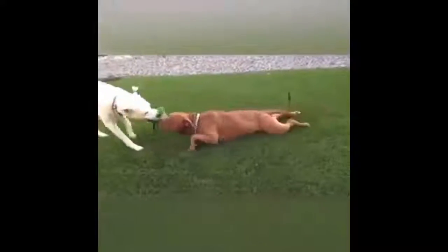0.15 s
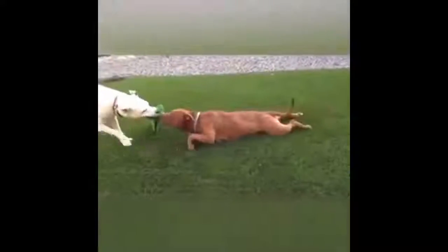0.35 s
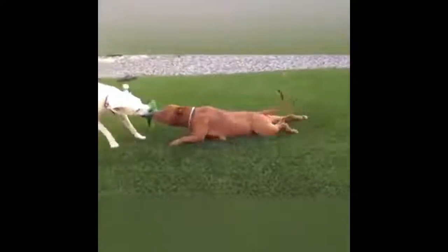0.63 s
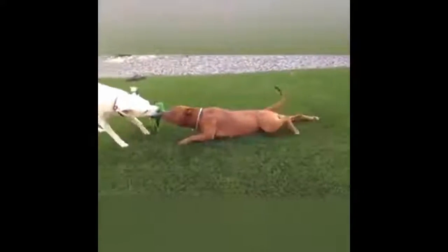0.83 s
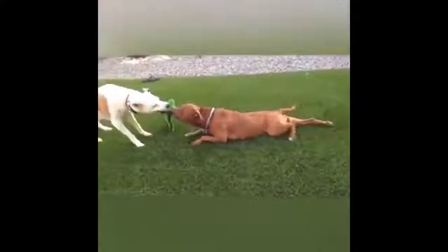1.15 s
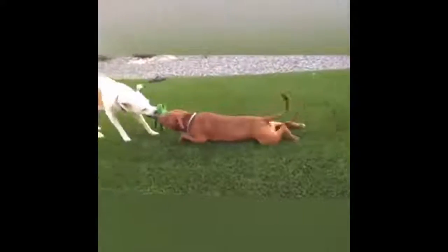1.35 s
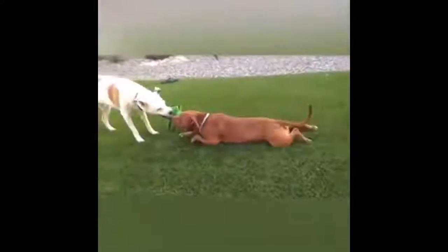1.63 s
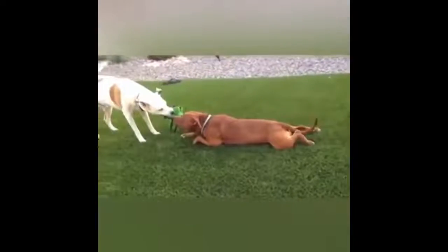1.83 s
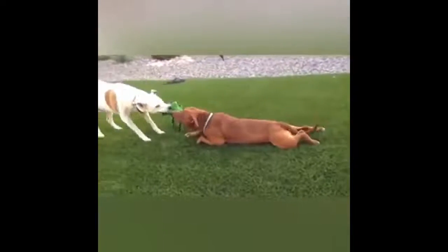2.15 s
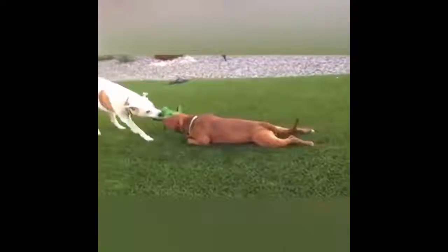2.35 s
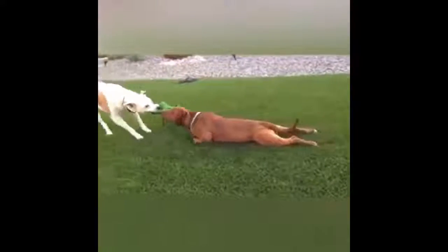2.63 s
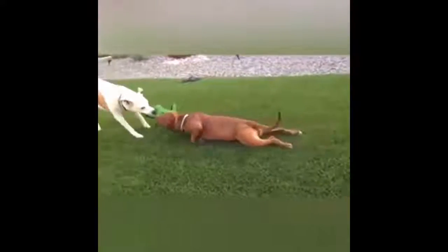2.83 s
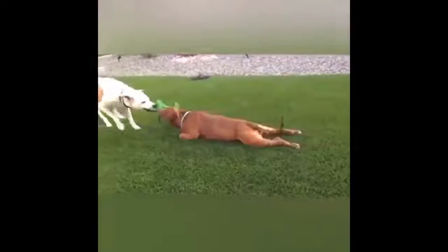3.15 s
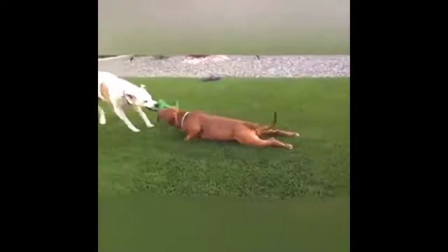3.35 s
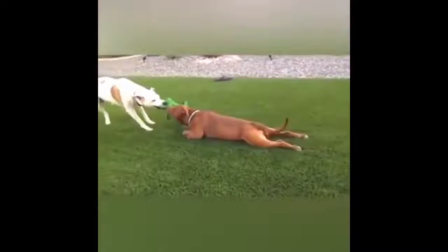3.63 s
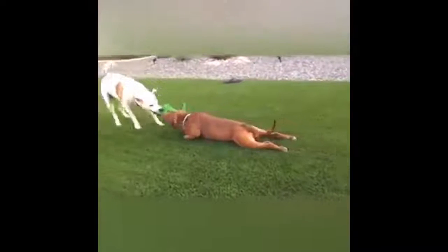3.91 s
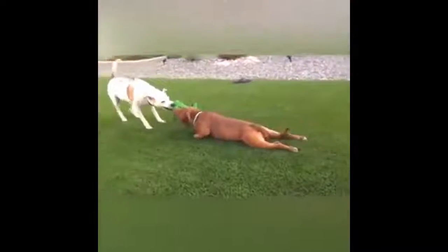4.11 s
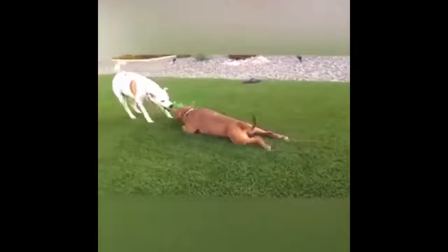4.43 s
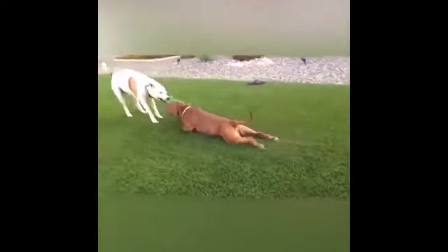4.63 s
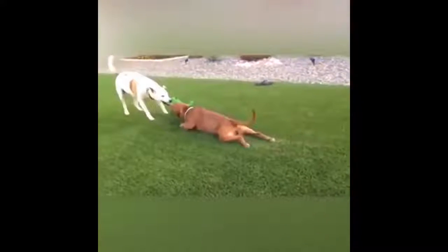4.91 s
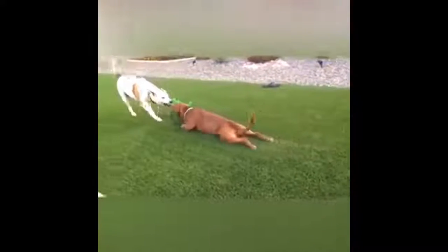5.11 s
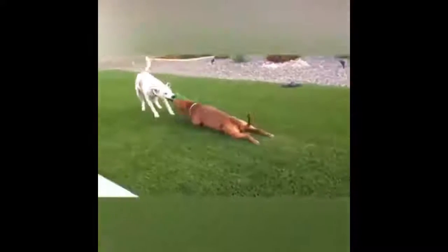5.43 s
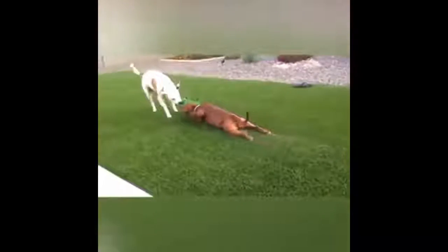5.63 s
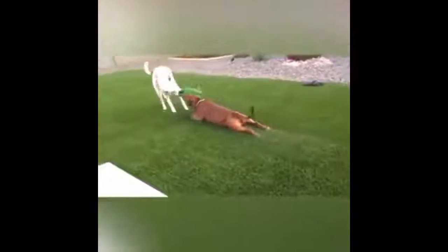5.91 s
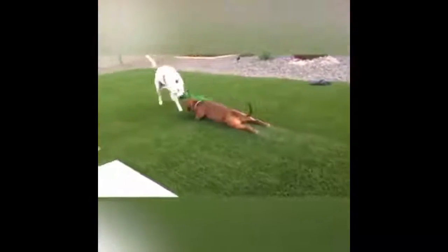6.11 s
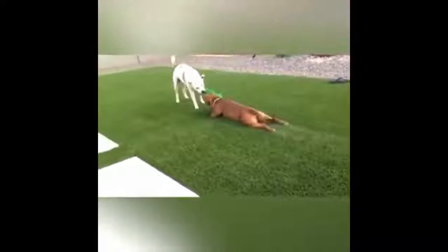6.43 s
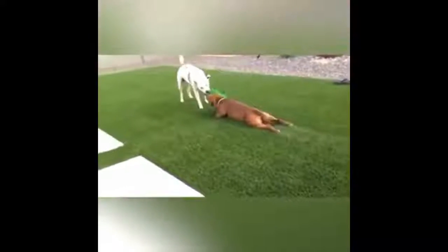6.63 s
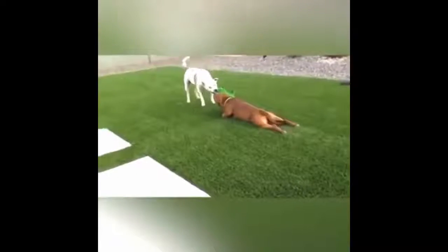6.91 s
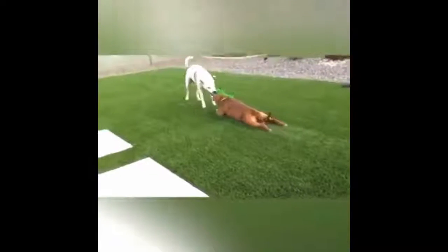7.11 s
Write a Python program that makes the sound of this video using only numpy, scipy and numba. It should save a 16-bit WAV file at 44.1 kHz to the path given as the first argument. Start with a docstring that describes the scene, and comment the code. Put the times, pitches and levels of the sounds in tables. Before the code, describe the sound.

Low playful growls come one after another from the start, a closed-mouth hum breaking into wet rasp, with single heavy flaps thudding in the throat. Small wet smacks, scratchy falling chirps and quick cracks come from a gripped rubber toy. Two faint nasal whines surface midway. Steady airy grass rustle continues underneath, dips near the end and returns. Open yard, little echo, modest handheld microphone without top treble, one tiny dropout early.

```python
"""Two dogs tug at a rubber toy on a lawn: short, low growls run over a hush of air and rustling grass.
From the start each growl opens as a muffled flutter and turns raspy; deep throbs break in, made of single flaps.
The toy soon snaps (cracks with a falling ring) and squelches (scratchy falling chirps) between their teeth.
The sound cuts out briefly after a second; a thin whine, a wavering sine, comes at 2.5 s and again at 4.3 s.
The rustle, made of crackling noise, sinks near the end and comes back."""
import sys
import numpy as np
from scipy import signal
from scipy.fft import rfft, irfft, next_fast_len
from scipy.io import wavfile
from scipy.ndimage import uniform_filter1d, map_coordinates
from numba import njit

SR = 44100
rng = np.random.default_rng(int(sys.argv[2]) if len(sys.argv) > 2 else 0)


def digitize_waveform(pressure):
    """Quantize a signal to 16-bit integers and store it at the path in sys.argv[1].

    Rows of a 2-D input are taken as channels; values are limited to [-1, 1].
    """
    field = np.atleast_2d(pressure).T
    bounded = np.clip(field, -1, 1)
    quanta = np.round(bounded * 32767).astype(np.int16)
    wavfile.write(sys.argv[1], SR, quanta)


N = 320166

# One push of air each: start_s, length_s, start_pitch_hz, widest_pitch_hz (lips widest apart),
# hum_db (through closed jaws), rasp_db (through the lips, before a small trim),
# widest (share of the length, 0-1), mouth_hz (resonance halfway through), rough (0-1)
GROWLS = [(0.06, 0.047, 170.2, 220.8, -31, -41, 0.8, 1670, 0.69),
          (0.196, 0.028, 184.4, 235, -27, -41.5, 0.71, 1210, 0.34),
          (0.213, 0.028, 233.6, 261.5, -23.5, -28.5, 0.36, 1920, 0.25),
          (0.394, 0.15, 185.1, 204.7, -31, -51, 0.78, 1520, 0.45),
          (0.675, 0.1, 195.2, 228.3, -26.5, -34, 0.62, 1290, 0.34),
          (0.967, 0.24, 181, 203, -29.5, -36.5, 0.3, 1217, 0.19),
          (1.307, 0.074, 180.1, 161.8, -39, -47.5, 0.65, 998, 0.83),
          (1.402, 0.057, 226.4, 215.9, -24.5, -32.5, 0.35, 1790, 0.19),
          (1.635, 0.26, 205.3, 171, -32.5, -45, 0.39, 1860, 0.67),
          (2.133, 0.068, 221, 204.7, -28.5, -48.5, 0.46, 881.5, 0.48),
          (2.21, 0.17, 180, 189.5, -30.5, -40, 0.51, 1700, 0.31),
          (2.548, 0.023, 184.6, 195, -29.5, -42.5, 0.97, 1500, 0.58),
          (2.699, 0.049, 170.6, 191.3, -31, -44, 0.36, 715, 0.47),
          (2.848, 0.034, 188.5, 199, -29, -42, 0.7, 894, 0.49),
          (3.038, 0.1, 170.2, 205.9, -31, -40.5, 0.51, 1394, 0.66),
          (3.282, 0.17, 170.4, 204.5, -31, -37.5, 0.69, 1623, 0.42),
          (3.624, 0.2, 154.4, 214.7, -33.5, -36.5, 0.64, 1864, 0.66),
          (3.924, 0.031, 170, 190.4, -29, -46.5, 0.65, 1228, 0.44),
          (4.154, 0.18, 189.9, 228.8, -33, -37, 0.3, 1890, 0.7),
          (4.417, 0.039, 190.3, 193.3, -36, -56, 0.4, 1423, 0.71),
          (4.665, 0.17, 180, 239.9, -30.5, -32.5, 0.62, 1820, .6),
          (5.075, 0.2, 168, 232.2, -32, -36.5, 0.72, 1770, .65),
          (5.487, 0.1, 180, 195, -37.5, -43.5, 0.22, 1256, 0.44),
          (5.697, 0.027, 170, 190, -33.5, -54, 0.64, 720, 0.58),
          (5.89, 0.2, 175, 249.9, -33, -33.5, 0.48, 877.7, .55),
          (6.278, 0.16, 150.5, 165.5, -38, -47.5, 0.22, 1903, 0.88),
          (6.939, 0.05, 160.7, 215, -34, -41, 0.83, 1898, 0.62),
          (7.121, 0.047, 175, 230, -34, -44.5, 0.7, 1950, 0.55)]
# Heavy single flaps of the throat: time_s, peak_db
THROBS = [(0.078, -16), (0.4314, -16.5), (0.6646, -26.5), (0.8982, -24), (0.9188, -22.5), (0.9583, -22),
          (1.304, -28), (1.3992, -23), (1.6337, -22), (1.7232, -21.5), (1.8565, -25.5), (2.0255, -22),
          (2.6937, -22), (2.8797, -28.5), (3.0363, -24.5), (3.1129, -19.5), (3.1369, -21), (3.315, -16.5),
          (3.655, -16.5), (3.7534, -19), (4.1615, -20.5), (4.2004, -21), (4.2554, -19.5), (4.29, -23.5),
          (4.314, -18.5), (4.6304, -21.5), (4.6457, -19), (4.655, -17.5), (5.0606, -24.5), (5.0915, -23),
          (5.1852, -40), (5.4957, -25), (6.3028, -23.5), (6.3327, -28), (6.392, -23.5), (6.5948, -28)]
# Waypoints of each whine: time_s, pitch_hz, level_db (before a gain)
WHINES = [
    [(2.48, 615, -62), (2.56, 666, -61), (2.63, 630, -60), (2.76, 605, -57)],
    [(4.32, 499, -55), (4.49, 507, -54.5), (4.58, 509, -55)],
]
# Teeth slipping on the wet toy: time_s, level_db (before a small trim), pitch_hz (mid-slip), half_width_s
SQUELCHES = [(0.491, -39.5, 1580, 0.0031), (0.527, -37, 1560, 0.0073), (0.563, -33, 1492, 0.003),
             (0.701, -29, 1056, .003), (0.738, -34, 1300, 0.0026), (1.743, -35.5, 2100, 0.0013),
             (1.913, -30, 1341, 0.0043), (2.2107, -36.5, 1143, 0.0029), (2.235, -32, 1070, 0.0031),
             (2.7581, -29, 1600, 0.0024), (3.157, -35, 1650, 0.0028), (3.468, -31.5, 1652, 0.0062),
             (4.246, -35, 1114, 0.01), (5.279, -35, 1994, .0073), (5.587, -37, 1842, 0.01),
             (6.0126, -30, 1690, 0.0033), (6.447, -42.5, 1700, 0.0094), (6.635, -40, 1700, 0.0073),
             (6.799, -32, 1710, 0.0026), (6.978, -32, 2000, 0.0052), (7.014, -34.5, 1850, 0.0087)]
# Teeth snapping off the toy: time_s, level_db, ring_hz (mid-fall), ring_t60_s, crack_db (relative to the ring)
SNAPS = [(0.1542, -22.5, 610, 0.0098, -20), (0.808, -26.5, 2990, 0.0067, 0.5),
         (0.893, -27, 562.3, 0.0099, -15), (0.9142, -32.5, 945, 0.016, -15.5),
         (1.335, -28, 964, 0.029, -26), (2.1, -25.5, 350, 0.0321, -15.5), (2.495, -27.5, 3414, 0.027, -7.5),
         (2.763, -24.5, 1162, 0.014, -24), (2.828, -35, 3360, 0.01, -7.5),
         (2.8386, -25, 3250, 0.023, -10.5), (3.2156, -31.5, 2160, 0.024, -16),
         (3.422, -26.5, 1440, 0.0089, -12.5), (3.741, -29, 1081, 0.018, -18.5),
         (3.991, -16.5, 1201, 0.0022, -18.5), (4.096, -28, 450, 0.016, -12.5),
         (5.013, -28, 1200, 0.0073, -12.5), (5.815, -26.5, 420, 0.025, -11),
         (6.9821, -23, 999.5, 0.017, -21.5)]
# Loudness of the grass over time: time_s, rustle_db (before a trim)
GRASS = [(0, -43), (.85, -47), (1.5, -43.5), (1.7, -49.5), (2.55, -47.5), (3, -48.5), (3.5, -47),
         (6.25, -46), (6.6, -57.5), (7.26, -48)]
# How far the lips are drawn back: time_s, share (0-1)
LIPS = [(1.3, 0.58), (3.0, 0.8)]

# Tone colours, all with the columns: frequency_hz, gain_db (relative)
# the throat with slack lips, with lips drawn back, and the chest heard through closed jaws
SLACK_THROAT = [(220, -16.5), (450, 16.5), (600, -4.5), (740, 15), (1020, 8.5), (1220, 14.5), (1500, 1),
                (2100, -6.5), (2400, -32), (3600, -21.5), (5200, -11), (8500, -19.5)]
DRAWN_THROAT = [(250, 4.5), (400, 9.5), (560, 7.5), (900, -2), (1060, -19.5), (1500, -5), (1900, -3),
                (2350, -12.5), (2950, -15), (3700, -10), (4350, -22.5), (5200, -32.5), (8500, -45.5)]
CHEST = [(40, -20.5), (110, 1.5), (170, -9), (290, 2), (380, -23.5), (800, -62.5)]
# the gap between teeth and toy, blades of grass, paws on turf, outdoor air
TEETH_GAP = [(2900, -25), (3400, 0), (4500, 0), (5200, -20)]
BLADES = [(400, 13), (1200, 6.5), (4000, 2.5), (5500, -2), (8500, -7.5)]
TURF = [(25, -32), (62, -3.0), (130, -5.0), (300, -23.5), (1500, -62.5)]
AIR = [(22, -30), (65, -1), (190, 3), (370, -15), (1800, -19.5), (3600, -20), (8500, -24)]

# The brief cut in the sound: start_s, end_s
SILENCE = (1.173, 1.194)

# how a growl rises and dies away
ATTACK_S, RELEASE_S = .013, .05  # time per 20 dB
HUM_SAG_DB = 5.5  # the hum sinks this much over a growl as the air runs out
SHUDDER_HZ, SHUDDER_DB = 31, 4.2  # typical rate; depth at roughness 1
# how the lips, jaw and pitch move in a growl
SHUT_START_DB, SHUT_END_DB = 12, 6  # the rasp is this much weaker at the start and at the end
LIPS_CLOSE_S = 0.24  # after a growl the lips shut off another 20 dB of rasp in this time
JAW_OCTAVES = 0.23  # the mouth resonance climbs this much as the jaw opens
FALL_OCTAVES = .22  # pitch sinks this much as the lips close again
# a faint grumble goes on between growls
IDLE_HZ, IDLE_HUM_DB, IDLE_RASP_DB = 169.24, -51, -62.5
IDLE_MOUTH_HZ, IDLE_ROUGH = 1290, .8
HISS_LAG_S, HISS_HZ = 0.028, 3767  # delay after the rasp; average resonance
STALL_S = .005  # the hum stalls about this long on each side of a heavy flap
SQUELCH_SWELL_S = .025  # time from the start of a squelch to its middle
TOP_HZ = 8650  # nothing sounds from here up


def growls(jitter=.025, rough_jitter=.19, threshold_db=-48, rasp_gain_db=-1.18, rattle_db=-9.0, hiss_db=-14.5):
    """Loose vocal folds flap: hum leaves the closed jaws; overtones, wet rasp and late hiss leave the lips."""
    hum_db, rasp_db, pitch_hz, mouth_hz, rough = effort()
    t = np.arange(N) / SR
    # the rougher the growl, the more unevenly the folds flap
    uneven_hz = pitch_hz * (1 + (jitter + rough_jitter * rough) * wobble(140))
    cycles = np.cumsum(uneven_hz) / SR
    closures = np.diff(np.floor(cycles), prepend=0)  # one click per cycle

    # the folds shut hard on about half of the cycles, and the chest rings on each such flap
    flaps = coloured(closures * (rng.random(N) < .5), CHEST)
    steady = .9 - .6 * rough
    tone = steady * unit(np.sin(2 * np.pi * cycles)) + (1 - steady) * flaps
    flutter = amp((1 + 2 * rough) * wobble(80))
    hum = sustained(flutter * tone)
    # below a threshold of pressure the folds stop, so growls start and end abruptly
    flapping = .5 + .5 * np.tanh((hum_db - threshold_db) / 4)
    hum *= flapping
    for s, _ in THROBS:
        near = np.abs(t - s) < 10 * STALL_S
        hum[near] *= 1 - np.exp(-((t[near] - s) / STALL_S) ** 2)

    # closures of uneven strength carry the overtones; each also spits a short puff through saliva
    pulses = closures * amp((2 + 4 * rough) * wobble(200))
    decay = np.exp(-1 / (.0013 * SR))  # a puff fades in about 1.3 ms
    spit = unit(signal.lfilter([1], [1, -decay], pulses))
    puffs = unit(rng.standard_normal(N) * (flapping * spit + .5))

    def voiced(hz):
        """Share of power from pulses: high at low frequencies, while puffs take over higher up."""
        return .8 / (1 + (hz / 1500) ** 4)

    source = filtered(unit(pulses - pulses.mean()), lambda hz: np.sqrt(voiced(hz)))
    source += filtered(puffs, lambda hz: np.sqrt(1 - voiced(hz)))
    source = patchy(source, depth_db=2.5)

    # the lips draw back as the tug gets harder
    lips = np.clip(curves(LIPS)[0], 0, 1)
    slack = coloured(source, SLACK_THROAT)
    drawn = coloured(source, DRAWN_THROAT)
    rasp = sustained((1 - lips) * slack + lips * drawn)
    rasp += flapping * amp(rattle_db) * rattle(closures, mouth_hz)
    late_rasp_db = np.interp(t - HISS_LAG_S, t, rasp_db)
    hiss = lips * amp(late_rasp_db + hiss_db) * teeth()
    return amp(hum_db) * hum + amp(rasp_db + rasp_gain_db) * rasp + hiss


def effort():
    """Hum, rasp, pitch, mouth and roughness: each growl starts as a hum, opens into a rasp and dies away."""
    t = np.arange(N) / SR
    hum, rasp = np.full(N, amp(IDLE_HUM_DB) ** 2), np.full(N, amp(IDLE_RASP_DB) ** 2)
    # overlapping growls blend in proportion to their hum power
    pitch, mouth, roughness = IDLE_HZ * hum, IDLE_MOUTH_HZ * hum, IDLE_ROUGH * hum
    for start, length, start_hz, wide_hz, hum_db, rasp_db, widest, mouth_hz, rough in GROWLS:
        near = (t > start - .05) & (t < start + length + .2)
        age = t[near] - start
        after = np.maximum(age - length, 0)
        edges_db = -20 * (np.maximum(1 / 2 - age / ATTACK_S, 0) + after / RELEASE_S)
        # a rough throat shudders in and out
        shudder_hz = SHUDDER_HZ * rng.uniform(.85, 1.15)
        shudder = np.cos(2 * np.pi * shudder_hz * (age - ATTACK_S))
        pressure_db = edges_db + SHUDDER_DB * rough * shudder
        progress = np.clip(age / length, 0, 1)
        stages = [0, np.clip(widest, 0, 1), 1]
        lips_db = -np.interp(progress, stages, [SHUT_START_DB, 0, SHUT_END_DB])
        lips_db -= 20 * after / LIPS_CLOSE_S
        pitch_hz = np.interp(progress, stages, [start_hz, wide_hz, wide_hz * 2 ** -FALL_OCTAVES])
        power = amp(hum_db + pressure_db - HUM_SAG_DB * progress) ** 2
        hum[near] += power
        rasp[near] += amp(rasp_db + pressure_db + lips_db) ** 2
        pitch[near] += power * pitch_hz
        mouth[near] += power * mouth_hz * 2 ** (JAW_OCTAVES * (progress - 1 / 2))
        roughness[near] += power * rough
    levels_db = 10 * np.log10(hum), 10 * np.log10(rasp)
    return *levels_db, pitch / hum, mouth / hum, np.clip(roughness / hum, 0, 1)


def rattle(closures, mouth_hz, uneven_db=11.0, drift_octaves=0.083, damping=0.029):
    """Flaps of very uneven strength ring the mouth, whose resonance shifts as the jaws work the toy."""
    knocks = closures * amp(uneven_db * wobble(260)) + .01 * rng.standard_normal(N)
    step = 2 * np.pi * mouth_hz * 2 ** (drift_octaves * wobble(45)) / SR
    ringing = resonate(knocks, step, damping)
    return sustained(unit(resonate(ringing, step, 0.44)))


def teeth(drift_octaves=0.067, damping=0.26):
    """Air rushes through the gap between teeth and toy, which resonates and shifts with the grip."""
    step = 2 * np.pi * HISS_HZ * 2 ** (drift_octaves * wobble(12)) / SR
    air = coloured(rng.standard_normal(N), TEETH_GAP)
    return unit(resonate(air, step, damping))


def throbs(ring_hz=140, width_s=0.0023, slap_db=-19):
    """A heavy flap: one pointed push of the chest, with a slap that sounds through the mouth."""
    out, slaps = np.zeros(N), np.zeros(N)
    t = np.arange(-SR // 50, SR // 50) / SR
    push = np.exp(-np.abs(t) / width_s) * np.cos(2 * np.pi * ring_hz * t)
    for s, db in THROBS:
        add(out, s + t[0], amp(db) * push)
        slaps[round(s * SR)] = amp(db + slap_db)
    through_mouth = coloured(slaps, DRAWN_THROAT)
    # scale so that the loudest slap keeps its peak
    return out + through_mouth * slaps.max() / np.abs(through_mouth).max()


def toy(gain_db=-0.5, smack_db=-50, smack_width_s=0.0029, count=44):
    """Loud slips of the toy, and many small wet smacks as the jaws shift their grip."""
    out = np.zeros(N)
    for s, db, hz, width_s in SQUELCHES:
        add(out, s - SQUELCH_SWELL_S, squelch(db + gain_db, hz, width_s))
    for when, size, pitch in rng.random((count, 3)):
        hz = 800 * 2 ** (pitch * 1.4)
        add(out, when * N / SR, squelch(smack_db + 10 * size ** 2, hz, smack_width_s))
    return out


def squelch(db, hz, width_s, fall=0.083, scratch_hz=280, tail_db=-17, tail_t60_s=0.16):
    """Wet rubber slips off a tooth: a scratchy chirp that swells and falls in pitch."""
    t = np.arange(SR // 8) / SR - SQUELCH_SWELL_S
    grip = unit(uniform_filter1d(rng.standard_normal(len(t)), size=24))
    pitch_hz = hz * (1 - fall * np.tanh(t / width_s)) + scratch_hz * grip
    phase = 2 * np.pi * np.cumsum(pitch_hz) / SR
    slip = 1 / np.cosh(t / width_s * np.where(t < 0, 1.5, 1))  # it lets go faster than it settles
    tail = amp(tail_db - 60 * np.abs(t) / tail_t60_s) * (t > 0)
    return amp(db) * (slip + tail) * (np.sin(phase) + amp(-14.0) * np.sin(2 * phase))


def snaps(rise_s=.0001, fall=.14, fall_s=0.0022, scratch=0.11, crack_t60_s=0.014):
    """A tooth lets go of the taut toy: a crack and a scratchy ring that drops as the rubber slackens."""
    out, t = np.zeros(N), np.arange(SR // 20) / SR
    for s, db, hz, t60_s, crack_db in SNAPS:
        grip = unit(uniform_filter1d(rng.standard_normal(len(t)), size=12))
        pitch_hz = hz * (1 + fall * (np.exp(-t / fall_s) - 1 / 2) + scratch * grip)
        ring = np.sin(2 * np.pi * np.cumsum(pitch_hz) / SR) * amp(-60 * t / t60_s)
        crack = amp(crack_db - 60 * t / crack_t60_s) * rng.standard_normal(len(t))
        onset = 1 - np.exp(-t / rise_s)
        add(out, s, amp(db) * onset * (ring + crack))
    return out


def whines(waver=0.004, flicker_db=2, fade_s=0.03, gain_db=2):
    """A thin, nearly pure whine through the nose."""
    out, t = np.zeros(N), np.arange(N) / SR
    for rows in WHINES:
        hz, db = curves(rows)
        inside_s = np.minimum(t - rows[0][0], rows[-1][0] - t)  # distance from the nearer end
        gate = np.clip(inside_s / fade_s + .5, 0, 1)
        level = amp(db + gain_db + flicker_db * wobble(26))
        cycles = np.cumsum(hz * (1 + waver * wobble(43))) / SR
        out += gate * level * unit(np.sin(2 * np.pi * cycles))
    return out


def lawn(grain_db=2.5, rustle_db=-4.0, air_db=-53, scuff_db=-52):
    """Blades of grass crackle under the dogs, paws scuff the turf, and the outdoor air hushes."""
    crackle = amp(grain_db * wobble(500) + 2.5 * wobble(30))
    grains = patchy(rng.standard_normal(N) * crackle, depth_db=3.5)
    rustle = amp(curves(GRASS)[0] + rustle_db) * coloured(grains, BLADES)
    turf = coloured(rng.standard_normal(N), TURF)
    scuffs = amp(scuff_db + 5.6 * wobble(12)) * turf
    air = amp(air_db) * coloured(rng.standard_normal(N), AIR)
    return rustle + scuffs + air


def yard(x, t60_s=0.14, wet_db=-16):
    """The garden walls answer faintly: x plus a fading noise echo."""
    t = np.arange(SR // 3) / SR
    tail = rng.standard_normal(len(t)) * amp(-60 * t / t60_s) * (t > .008)
    echo = signal.fftconvolve(x, tail / np.linalg.norm(tail))[:N]
    return x + amp(wet_db) * echo


def amp(db):
    """Decibels to gain."""
    return 10 ** (np.asarray(db) / 20)


def unit(x):
    """Scale to rms (average strength) 1."""
    return x / np.sqrt(np.mean(x ** 2) + 1e-20)


def sustained(x):
    """x with its loudness held even over some 40 ms; faster roughness stays."""
    return x / np.sqrt(np.abs(uniform_filter1d(x ** 2, size=SR // 25)) + 1e-6)


def curves(rows):
    """One value per sample for each column after the time."""
    s, *cols = np.transpose(rows)
    return [np.interp(np.arange(N) / SR, s, c) for c in cols]


def wobble(rate):
    """A smooth random curve with its extremes tamed, rate knots a second."""
    knots = rng.standard_normal(N // 10)
    return unit(np.tanh(map_coordinates(knots, [np.arange(N) * rate / SR], mode="wrap")))


def patchy(x, depth_db):
    """Narrow bands of x flare and sink for a hundredth of a second or two."""
    z = signal.stft(x, nperseg=512)[2]
    field = uniform_filter1d(rng.standard_normal(z.shape), size=6, axis=0)
    field = uniform_filter1d(field, size=3, axis=1)
    gain = amp(depth_db * unit(np.tanh(unit(field) / 2)))
    return unit(signal.istft(z * gain, nperseg=512)[1][:N])


def filtered(x, response):
    """x times a response of frequency."""
    size = next_fast_len(N + SR // 2)
    return irfft(rfft(x, size) * response(np.fft.rfftfreq(size, 1 / SR)), size)[:N]


def coloured(x, points):
    """x through a filter of the given (frequency_hz, gain_db) shape that never rings early, at rms 1."""
    size = 4096
    hz, db = np.transpose(points)
    gain = amp(np.interp(np.log(np.fft.rfftfreq(size, 1 / SR) + 1), np.log(hz), db))
    # folding the cepstrum (spectrum of the log gain) puts the response after time zero
    cepstrum = irfft(np.log(gain))[:size // 2]
    cepstrum[1:] *= 2
    impulse = irfft(np.exp(rfft(cepstrum, size)))
    return unit(signal.fftconvolve(x, impulse)[:N])


@njit
def resonate(x, step, damping):
    """x through one resonance whose centre (step, radians a sample) moves."""
    out = np.zeros(len(x))
    low = band = 0.0
    for i in range(len(x)):
        low += step[i] * band
        band += step[i] * (x[i] - low - damping * band)
        out[i] = band
    return out


def add(track, s, sound):
    """Mix a short sound in at time s."""
    part = track[max(round(s * SR), 0):][:len(sound)]
    part += sound[:len(part)]


def scene():
    """The dogs and their toy, echoed by the yard, over the sounds of the lawn."""
    dogs = growls() + throbs() + toy() + snaps() + whines()
    return (yard(dogs) + lawn())[None]


def record(dry, low_cut_hz=48):
    """The deepest bass is thinned, the sound cuts out for an instant, and the top of the treble is removed."""
    t = np.arange(N) / SR
    live = (t < SILENCE[0]) | (t > SILENCE[1])
    heard = filtered(dry[0], lambda hz: hz ** 2 / np.hypot(hz ** 2, low_cut_hz ** 2))
    return filtered(heard * live, lambda hz: hz < TOP_HZ)[None]


dry = scene()
out = record(dry)
digitize_waveform(out)
```